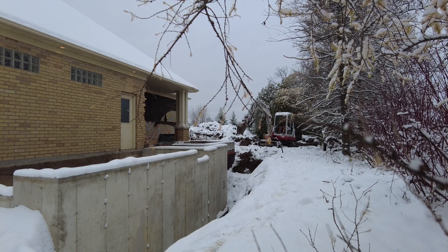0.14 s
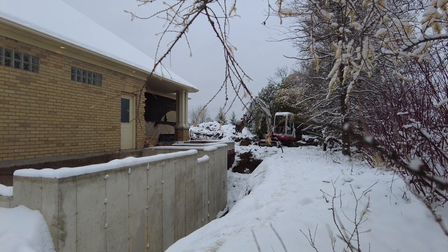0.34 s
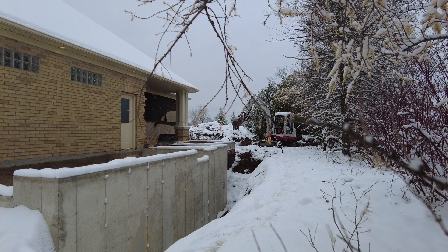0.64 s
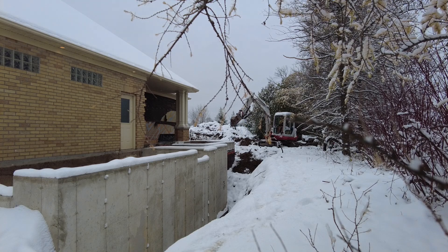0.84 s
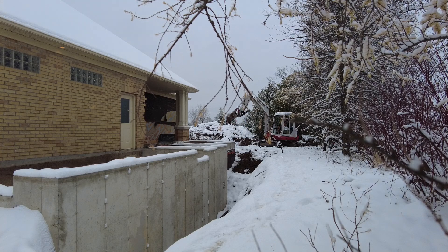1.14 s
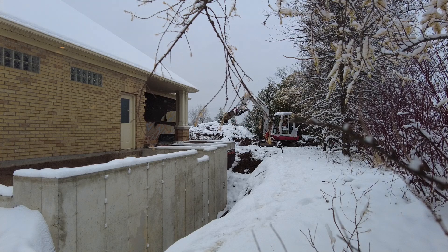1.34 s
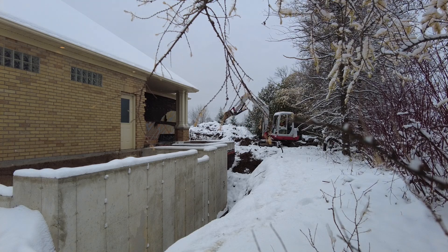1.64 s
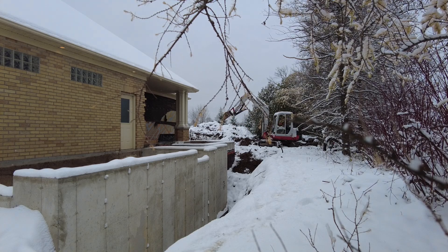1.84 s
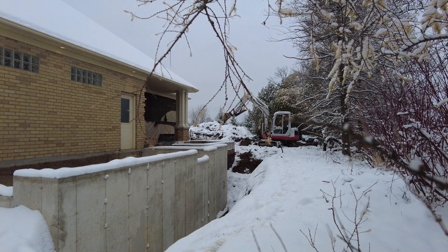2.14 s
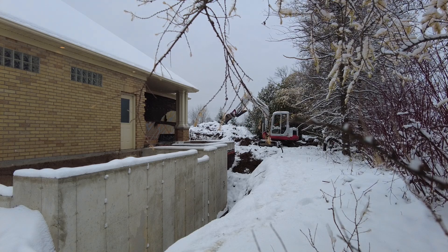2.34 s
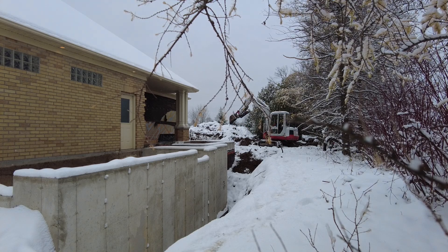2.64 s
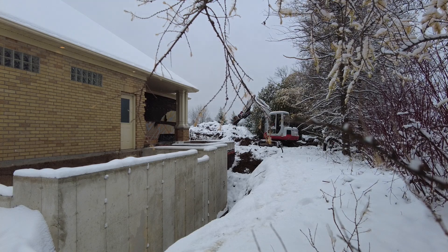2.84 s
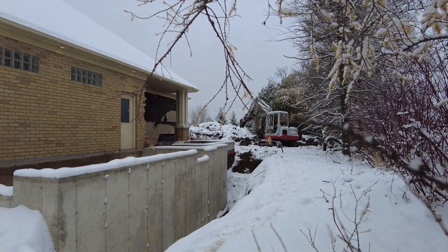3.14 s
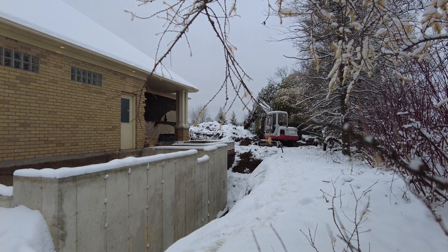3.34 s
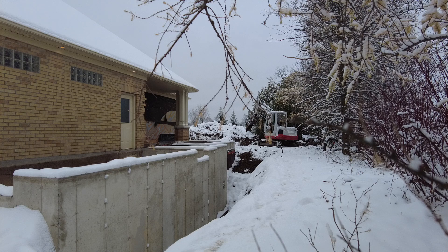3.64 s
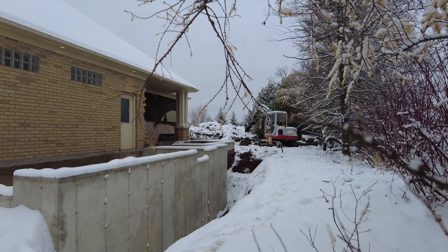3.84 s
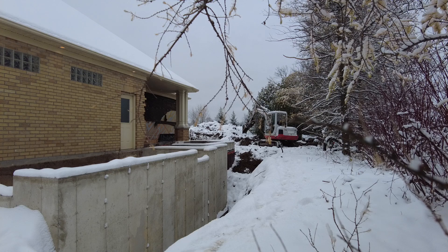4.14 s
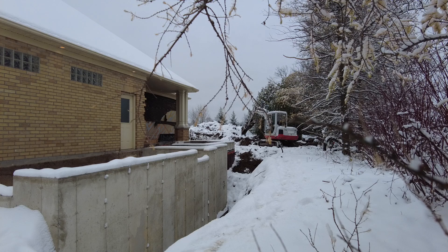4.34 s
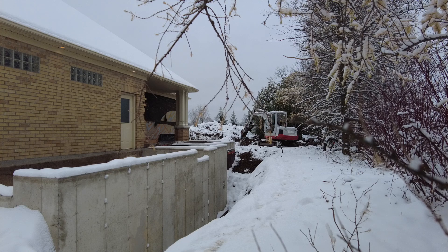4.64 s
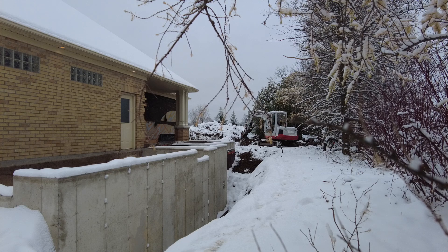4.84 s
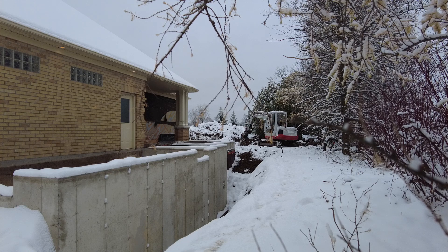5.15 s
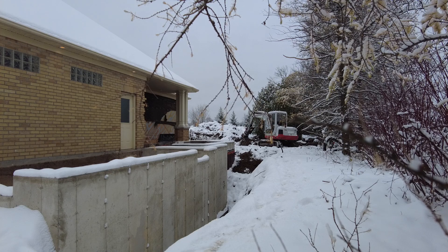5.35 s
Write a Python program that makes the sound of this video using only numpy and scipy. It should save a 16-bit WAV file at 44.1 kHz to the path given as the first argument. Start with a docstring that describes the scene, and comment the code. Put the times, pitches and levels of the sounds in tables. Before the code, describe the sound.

A mini excavator works outdoors by a brick wall, some distance from a stereo microphone. A deep, smooth exhaust hum dominates, with faint pump whine and dull knocking. Around 2.5 seconds the load eases, the hum drops and pitch rises slightly; then the hum returns with stronger knock, rattle and hiss until the end.

```python
"""Small diesel digger beside a brick wall

The exhaust of a four-cylinder engine hums at the firing rate; a geared hydraulic pump whines in step.
Bursts of noise at each stroke make the block's knock and the injectors' rattle, looped noise the gears.
Knock, rattle and oil hiss grow as the cab swings its engine side round; the load eases briefly.
Fainter: narrow treble hisses, one of them falling, and a few ticks of loose steel."""
import sys
import numpy as np
from scipy import signal
from scipy.io import wavfile

SR = 44100
rng = np.random.default_rng(int(sys.argv[2]) if len(sys.argv) > 2 else 0)


def nominal_scale(level):
    """Amplitude ratio for a level in decibels (scalar or array-like)."""
    x = np.asarray(level, float) / 20
    return 10 ** x


def wav_record(signal):
    """Record a signal, one row per channel, as 16-bit PCM in the file named by sys.argv[1]."""
    frames = np.transpose(np.atleast_2d(signal))
    bounded = np.clip(frames, -1, 1)
    # unit amplitude maps onto the largest positive 16-bit level
    quanta = np.round(bounded * 32767).astype(np.int16)
    wavfile.write(sys.argv[1], SR, quanta)


N = 242991


def rms_one(x):
    """Scale to unit rms."""
    return x / np.sqrt(np.mean(x ** 2) + 1e-20)


def in_time(rows):
    """Columns of a curve table, one value per sample."""
    s, *columns = np.transpose(rows)
    return [np.interp(np.arange(N) / SR, s, c) for c in columns]


def at_hz(points, hz):
    """Read a spectrum on a log-frequency axis."""
    table_hz, value = np.transpose(points)
    return np.interp(np.log(hz), np.log(table_hz), value)


def bandpass(x, low_hz, high_hz):
    """Second-order Butterworth band filter."""
    return signal.sosfilt(signal.butter(2, [low_hz, high_hz], "band", fs=SR, output="sos"), x)


def lowpass(x, order, top_hz):
    """Butterworth low-pass."""
    return signal.sosfilt(signal.butter(order, top_hz, fs=SR, output="sos"), x)


def lift(x, peaks):
    """Resonances raise or lower narrow bands, one after another."""
    for hz, width_hz, lift_db in peaks:
        x = x + (nominal_scale(lift_db) - 1) * signal.lfilter(*signal.iirpeak(hz, hz / width_hz, fs=SR), x)
    return x


def drift(corner_hz):
    """Slow chance, rms 1: noise at every 40th sample through a double one-pole low-pass."""
    pole = np.exp(-2 * np.pi * corner_hz * 40 / SR)
    noise = rng.standard_normal(N // 40 + 2002)
    slow = signal.lfilter([1], [1, -2 * pole, pole ** 2], noise)[2000:]     # settled part
    return np.interp(np.arange(N) / 40, np.arange(len(slow)), rms_one(slow))


# how hard each cylinder knocks: level [dB]
CYLINDER_DB = [1.6, 0.4, -0.8, -1.2]


def throb(firings, steady_power):
    """Each firing gives a quick, dying burst over a steady part; cylinders and strokes differ."""
    early = firings + 0.11      # bursts lead by this share of a firing
    stroke = np.floor(early).astype(int)
    chance_db = 1.1 * rng.standard_normal(stroke[-1] + 2)[stroke]
    strength_db = np.array(CYLINDER_DB)[stroke % 4] + chance_db
    burst = np.sin(np.pi * (early % 1) ** 0.48) ** 2
    return np.sqrt(steady_power + nominal_scale(2 * strength_db) * burst)


# stereo correlation: (frequency [Hz], left-right likeness [0 to 1])
LIKENESS = [(30, 0.79), (130, 0.98), (290, 0.87), (560, 0.59), (1050, 0.45), (1350, 1), (2200, 0.79),
            (4500, 0.33), (8000, 0.49), (15000, 0.31)]
# stereo balance: (frequency [Hz], left minus right [dB])
BALANCE_DB = [(150, 0), (700, 1.5), (1300, 0), (4000, -1), (15000, -1.2)]
# wall's delay of the left: (frequency [Hz], lag [us])
WALL_LAG_US = [(350, 1), (600, 110), (1000, 150), (1300, 1)]


def banded_noise(spectrum, patchy_db, firings=None, steady_power=None):
    """Third-octave stereo noise, rms 1: each band has its level, flicker, throb, likeness and balance."""
    low_end, high_end = spectrum[0][0], spectrum[-1][0]
    edges = low_end * 2 ** np.arange(0, np.log2(high_end / low_end) + 1 / 3, 1 / 3)
    together = drift(54)
    white = rng.standard_normal((2, 2, N + SR // 4))
    out = 0
    for k, (low, high) in enumerate(zip(edges, edges[1:])):
        mid, side = bandpass(white[k % 2], low, high)[:, -N:]
        hz = np.sqrt(low * high)
        flicker_db = patchy_db * (0.17 * together + drift(36))
        gain = nominal_scale(at_hz(spectrum, hz) + flicker_db)
        if steady_power:
            gain = gain * throb(firings, steady_power)
        alike = np.clip(at_hz(LIKENESS, hz), 0, 1)
        pair = np.sqrt(1 + alike) * mid + np.sqrt(1 - alike) * side * [[1], [-1]]
        pair[0] = np.roll(pair[0], round(at_hz(WALL_LAG_US, hz) * SR / 1e6))
        half_db = at_hz(BALANCE_DB, hz) / 2
        out = out + gain * pair * nominal_scale(np.array([[half_db], [-half_db]]))
    return rms_one(out)


# engine speed and load: (time [s], firing rate [1/s], exhaust hum level [dB])
ENGINE = [(0, 69.9, -30), (.6, 70.0, -29.5), (1.0, 69.5, -31), (1.6, 70.1, -33), (2.0, 70.2, -35),
          (2.3, 71.0, -39), (2.4, 73.1, -43), (2.5, 73.5, -45.5), (2.65, 72.7, -45), (2.8, 72.5, -42),
          (3.2, 71.2, -37), (3.55, 70.0, -33), (3.85, 69.8, -32.5), (4.05, 69.2, -31.5), (4.2, 70.0, -33),
          (4.6, 70.5, -34), (5.0, 70.5, -33.5), (5.2, 72.4, -35.5), (5.3, 70.8, -35), (5.4, 68.3, -31.5),
          (5.51, 67.7, -30)]
# block's knock, growing as the engine side swings round: (time [s], level [dB])
KNOCK_LEVEL = [(0, -58.5), (1.05, -58), (1.85, -54), (2.3, -53.5), (2.55, -54.5), (3.0, -52.5), (3.6, -51),
               (4.15, -51.5), (5.3, -51), (5.51, -50)]


def engine():
    """The crank counts firings; hum level tells the load, knock level the swing of the cab."""
    per_s, hum_db = in_time(ENGINE)
    knock_db, = in_time(KNOCK_LEVEL)
    return np.cumsum(per_s) / SR, hum_db, knock_db


def follow(layer, hum_db, knock_db):
    """A layer's level [dB] rises with the swing of the engine side and falls as the load eases."""
    base_db, db_per_knock_db, db_per_hum_db = layer
    turned_away_db, full_load_db = -58, -30     # reference knock and hum
    swing_db, eased_db = knock_db - turned_away_db, full_load_db - hum_db
    return base_db + db_per_knock_db * swing_db - db_per_hum_db * eased_db


# second harmonic: (level turned away at full load [dB], gain per knock [dB/dB], loss per hum drop [dB/dB])
SECOND_HARMONIC = (-46.5, 0.52, 0.41)
# third harmonic: (time [s], level [dB])
GROWL_LEVEL = [(0, -87), (1.0, -80), (1.9, -62), (2.4, -66), (2.85, -63.5), (3.05, -54), (3.5, -55.5),
               (4.1, -55.5), (4.5, -57.5), (5.51, -67)]
# slow phase shift of the hum's overtones: (time [s], phase [rad])
OVERTONE_SHIFT = [(.4, -.15), (1.35, .8), (1.95, 1.9), (3.4, 1.5), (4.0, 1.4), (4.8, 1.7)]
# factor of that shift for harmonics 1 to 4: factor [1]
SHIFT_FACTOR = [0, 1, -.5, -1.2]


def exhaust(firings, hum_db, knock_db):
    """The silencer passes only the lowest harmonics, wavering with uneven combustion; the overtones
    shift in phase against the hum."""
    second_db = follow(SECOND_HARMONIC, hum_db, knock_db)
    (third_db,), (shift_rad,) = in_time(GROWL_LEVEL), in_time(OVERTONE_SHIFT)
    levels_db, wavers_db = [hum_db, second_db, third_db, hum_db - 38.5], [0.04, 0.16, 1.5, 1.8]
    out = 0
    for k, level_db, waver_db, factor in zip([1, 2, 3, 4], levels_db, wavers_db, SHIFT_FACTOR):
        phase = k * (2 * np.pi * firings - np.pi / 2) + factor * shift_rad
        if k > 2:
            phase = phase + 0.55 * drift(7.7)
        out = out + nominal_scale(level_db + waver_db * drift(22)) * np.cos(phase)
    air_sway = nominal_scale(0.14 * drift(1.1) * [[1], [-1]])
    return np.sqrt(2) * out * air_sway


# pump tone, rising and fading: (time [s], level [dB])
PUMP_LEVEL = [(0, -50), (.95, -55), (1.24, -70.5), (1.32, -59), (1.75, -60), (2.31, -55), (2.38, -63),
              (2.6, -61.5), (2.75, -53.5), (4.05, -54.5), (4.41, -59), (4.54, -76), (4.65, -64),
              (4.95, -61), (5.26, -60), (5.33, -53.5), (5.51, -57)]
# overtones swelling with a lever move:
# (middle [s], half length to 1/e [s], multiple of firing rate [1], level at middle [dB])
WHINES = [(0.202, 0.4, 15.0, -65.5), (0.92, 0.093, 17.5, -66), (2.217, 0.13, 10.0, -59.5),
          (2.5, 0.12, 15.0, -58.5), (2.598, 0.13, 17.5, -63), (2.72, 0.19, 10.0, -56.5),
          (3.037, 0.092, 10.0, -57), (3.128, 0.17, 15.0, -58), (3.904, 0.34, 12.5, -60.5),
          (4.548, 0.99, 25.0, -64), (5.304, 0.26, 15.0, -64.5)]


def pump(firings):
    """Pistons geared to the crank, five pulses a firing, sing a tone in step with the engine, its level
    changing; overtones swell and fade."""
    t = np.arange(N) / SR
    tone_db = in_time(PUMP_LEVEL)[0] + 0.57 * drift(6.7)
    tone = nominal_scale(tone_db) * np.exp(2j * np.pi * 5 * firings)
    whine = 0
    blur_rad, flicker_db = 0.35, 2.0    # rms
    for middle_s, half_s, multiple, level_db in WHINES:
        swell = np.exp(-np.abs((t - middle_s) / half_s) ** 3)
        phase = 2 * np.pi * multiple * firings + blur_rad * drift(14)
        whine = whine + nominal_scale(level_db + flicker_db * drift(7)) * swell * np.exp(1j * phase)
    # the wall's reflection shifts the phase between the two microphones
    pair = [tone * np.exp(side * 0.15j) + whine * np.exp(side * 0.4j) for side in (1, -1)]
    return np.sqrt(2) * np.real(pair)


# rumble spectrum: (frequency [Hz], relative density [dB per Hz])
RUMBLE = [(10, -3), (35, 1.5), (55, 3), (80, -2), (95, -9), (120, -6.5), (170, -19), (260, -23),
          (500, -20.5), (800, -25), (1300, -38.5)]


def rumble():
    """Low noise at a constant level, barely flickering."""
    return nominal_scale(-47) * banded_noise(RUMBLE, patchy_db=0.5)


# shudder spectrum: (frequency [Hz], relative density [dB per Hz])
SHUDDER = [(90, -2), (150, -3), (210, -4), (270, -13.5), (400, -14.5), (700, -22.5), (1000, -18)]
# body shudder: (level turned away at full load [dB], gain per knock [dB/dB], loss per hum drop [dB/dB])
BODY_SHUDDER = (-56, 0.67, 0.038)


def shudder(hum_db, knock_db):
    """The body shakes as low noise that follows swing and load."""
    return nominal_scale(follow(BODY_SHUDDER, hum_db, knock_db)) * banded_noise(SHUDDER, patchy_db=-1.0)


# knock and gear spectrum: (frequency [Hz], relative density [dB per Hz])
KNOCK = [(400, -15.5), (700, 1.5), (900, 4), (1300, 4), (1800, 1), (2100, 0), (2900, -14.5), (3600, -22)]


def knock(firings, knock_db):
    """Combustion strikes the block: noise bursts at every firing."""
    return nominal_scale(knock_db) * banded_noise(KNOCK, patchy_db=-0.17, firings=firings, steady_power=0.99)


def contacts(firings, spectrum, renew_hz):
    """Gears and valves meet alike on every crank turn: looped noise whose pattern slowly renews; rms 1."""
    place = (firings / 2 % 1 * 1260).astype(int)    # two firings a turn
    loops = rng.standard_normal((3, 1260))[:, place]
    edges = np.geomspace(spectrum[0][0], spectrum[-1][0], num=12)
    out = 0
    for low, high in zip(edges, edges[1:]):
        rung = bandpass(loops, low, high)
        shares = np.array([drift(renew_hz) for _ in rung])
        shares /= np.sqrt(np.sum(shares ** 2, axis=0) + 1e-3)   # the mix changes, the level stays
        out = out + nominal_scale(at_hz(spectrum, np.sqrt(low * high))) * np.sum(shares * rung, axis=0)
    return rms_one(out)


def gears(firings, knock_db):
    """Gear contacts throb with the firings, 3 dB under the knock."""
    pulse = rms_one(throb(firings, steady_power=1.5))
    return nominal_scale(knock_db - 3) * contacts(firings, KNOCK, renew_hz=1.26) * pulse


# rattle spectrum: (frequency [Hz], relative density [dB per Hz])
RATTLE = [(1900, -1.5), (2300, -0.5), (2900, -2.5), (3250, -0.5), (3600, -6.5)]
# injectors' rattle: (time [s], level before the cowling [dB])
RATTLE_LEVEL = [(0, -68), (.8, -70), (1.2, -65), (1.75, -60.5), (2.25, -61), (2.55, -68.5), (3.0, -64.5),
                (3.45, -60.5), (5.05, -61), (5.51, -60.5)]


def rattle(firings):
    """Injectors rattle in sharp bursts; the cowling stops the sound above 3410 Hz."""
    noise = banded_noise(RATTLE, patchy_db=0.1, firings=firings, steady_power=0.2)
    return lowpass(nominal_scale(in_time(RATTLE_LEVEL)[0]) * noise, 6, 3410)


# cover panel resonances: (frequency [Hz], width [Hz], lift [dB])
PANELS = [(800, 70, -4), (950, 60, -5.5), (1170, 60, -5), (2000, 90, -2), (2350, 120, 2), (2500, 90, -4),
          (2850, 250, 2.5), (3250, 100, 4), (3400, 150, -3)]


def cover(x):
    """The engine cover's panels ring at some pitches and shut others in."""
    return lift(x, PANELS)


# clatter spectrum: (frequency [Hz], relative density [dB per Hz])
CLATTER = [(2800, 5), (3600, 1.5), (4500, -3), (6500, -5.5), (8500, -24.5), (11000, -32)]
# valve clatter: (level turned away at full load [dB], gain per knock [dB/dB], loss per hum drop [dB/dB])
VALVE_CLATTER = (-66.5, 0.83, 0.042)


def clatter(firings, hum_db, knock_db):
    """Valves clatter as throbbing noise that follows swing and load."""
    noise = banded_noise(CLATTER, patchy_db=2.0, firings=firings, steady_power=2.6)
    return nominal_scale(follow(VALVE_CLATTER, hum_db, knock_db)) * noise


# hiss spectrum: (frequency [Hz], relative density [dB per Hz])
HISS = [(7000, -1.5), (9500, -4.5), (12500, -7), (16000, -3.5)]
# oil hiss: (time [s], level [dB])
HISS_LEVEL = [(0, -74.5), (.6, -75.5), (2.2, -71), (2.5, -76.5), (3.5, -66.5), (4.9, -66.5), (5.35, -68.5),
              (5.51, -64.5)]


def oil_hiss(firings):
    """Oil hisses as treble noise, throbbing with the firings."""
    noise = banded_noise(HISS, patchy_db=1.75, firings=firings, steady_power=1.7)
    return nominal_scale(in_time(HISS_LEVEL)[0]) * noise


# narrow hiss while the engine side is hidden: (time [s], level [dB])
EARLY_HISS = [(0, -85), (1.3, -87), (1.8, -105)]
# its band: (low edge [Hz], high edge [Hz])
EARLY_HISS_HZ = (12600, 13500)


def early_hiss():
    """A narrow band of flickering noise high in the treble."""
    noise = bandpass(rng.standard_normal((2, N)), *EARLY_HISS_HZ)
    return nominal_scale(in_time(EARLY_HISS)[0] + 2.5 * drift(13)) * rms_one(noise)


# faint falling hiss: (time [s], centre [Hz], level [dB])
VALVE = [(.3, 15700, -92), (.45, 15500, -78), (.58, 15400, -80), (.72, 15100, -74), (.84, 14000, -75),
         (.97, 13100, -80), (1.15, 12900, -95)]


def valve():
    """Narrow noise, 600 Hz to either side, rides on a falling pitch."""
    hz, level_db = in_time(VALVE)
    spread = lowpass(rng.standard_normal((2, N)), 2, 600)
    carrier = np.cos(2 * np.pi * np.cumsum(hz) / SR)
    return nominal_scale(level_db + 1.5 * drift(20)) * rms_one(spread * carrier)


# small metal ticks: (time [s], level before the band filter [dB])
TICKS = [(1.16, -63), (2.49, -65), (5.185, -68)]


def ticks():
    """Faint, soft-edged clacks of loose steel: noise swelling for 4 ms, then dying."""
    out, t = np.zeros((2, N)), np.arange(2000) / SR
    shape = t / 0.004 * np.exp(1 - t / 0.004)
    for s, level_db in TICKS:
        at = round(s * SR)
        out[:, at:at + len(t)] += nominal_scale(level_db) * rng.standard_normal((2, len(t))) * shape
    return bandpass(out + 1e-18, 4500, 9500)


def scene():
    """Tones and noises of the machine, the periodic ones timed by one count of firings."""
    firings, hum_db, knock_db = engine()
    tones = exhaust(firings, hum_db, knock_db) + pump(firings)
    low_noise = rumble() + shudder(hum_db, knock_db)
    covered = cover(knock(firings, knock_db) + gears(firings, knock_db) + rattle(firings))
    treble = clatter(firings, hum_db, knock_db) + oil_hiss(firings) + early_hiss() + valve()
    return tones + low_noise + covered + treble + ticks()


def top_cut(x):
    """Nothing passes above the cut-off."""
    return signal.sosfilt(signal.butter(12, 15750, fs=SR, output="sos"), x)


# microphone housing resonances: (frequency [Hz], width [Hz], lift [dB])
HOUSING = [(2820, 400, 4), (4350, 500, 2.5), (6000, 700, 3.5), (7700, 400, 7), (9350, 550, 7),
           (10800, 600, 3.5), (12350, 650, 6)]


def record(dry):
    """The machine stands slightly right, so the left port hears late; the housing lifts treble bands."""
    left_lag_us = 11
    lag = left_lag_us * SR / 1e6
    a = (1 - lag) / (1 + lag)   # an allpass delays by part of a sample
    ports = np.array([signal.lfilter([a, 1], [1, a], dry[0]), dry[1]])
    mix = lift(ports, HOUSING)
    return top_cut(mix)


dry = scene()
out = record(dry)
wav_record(out)
```